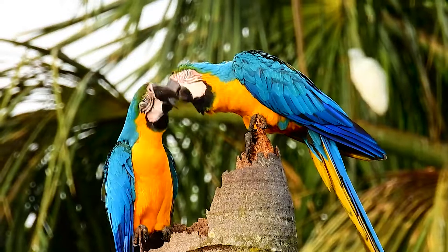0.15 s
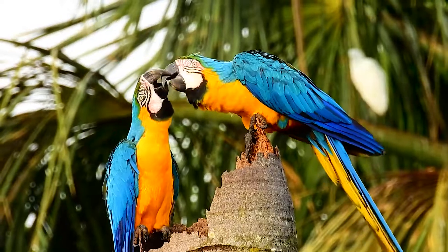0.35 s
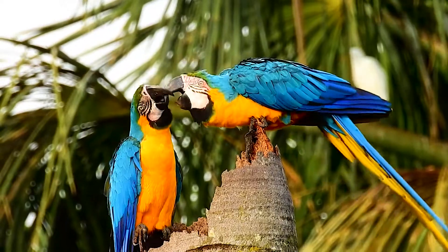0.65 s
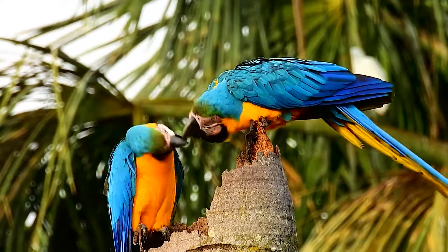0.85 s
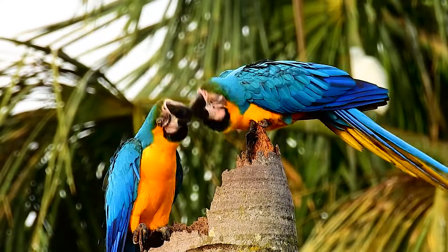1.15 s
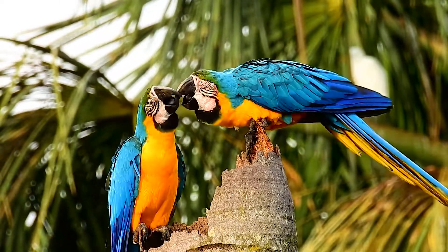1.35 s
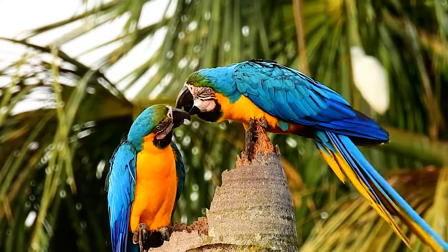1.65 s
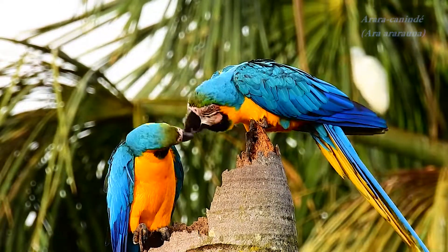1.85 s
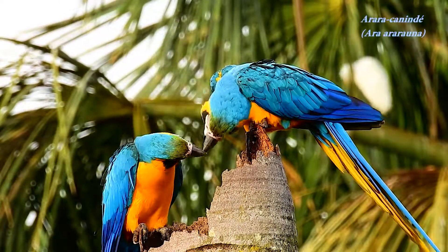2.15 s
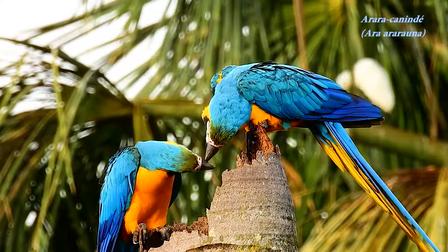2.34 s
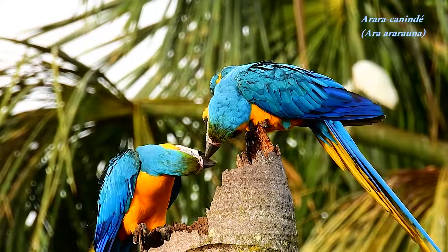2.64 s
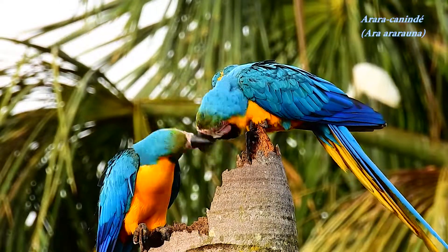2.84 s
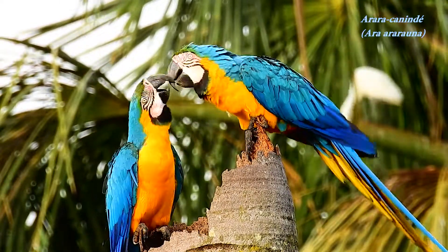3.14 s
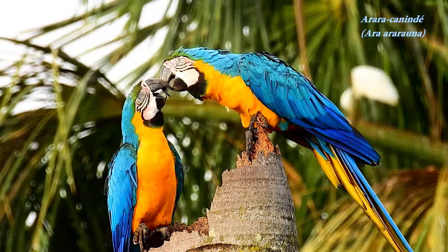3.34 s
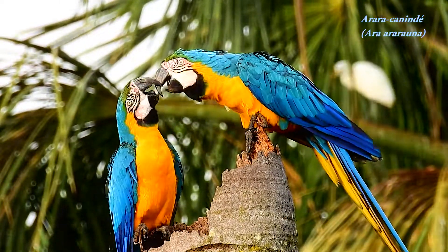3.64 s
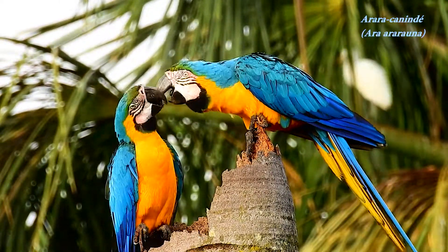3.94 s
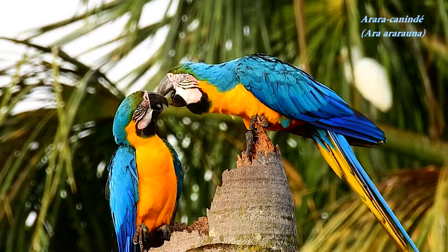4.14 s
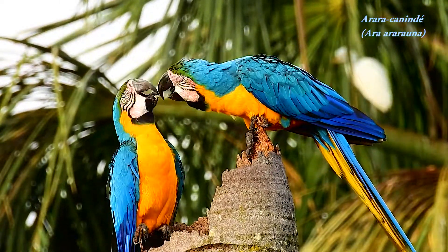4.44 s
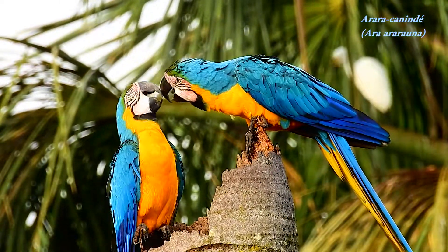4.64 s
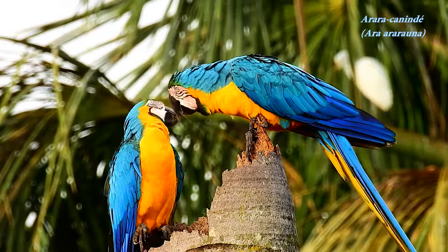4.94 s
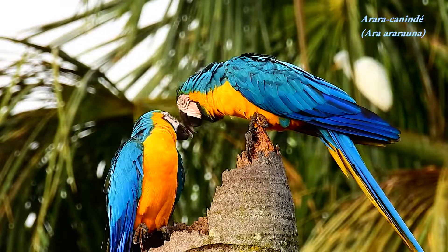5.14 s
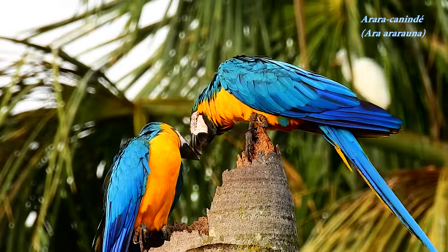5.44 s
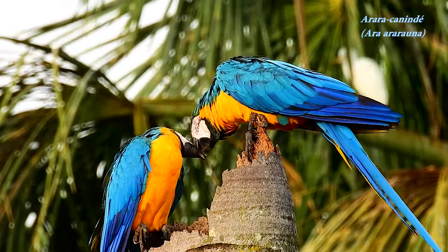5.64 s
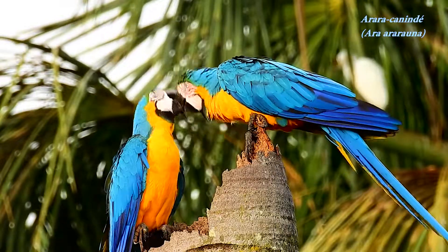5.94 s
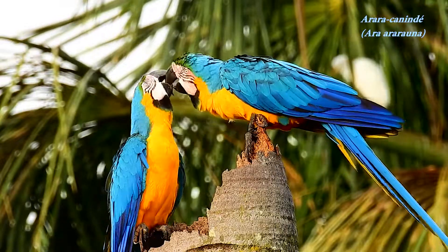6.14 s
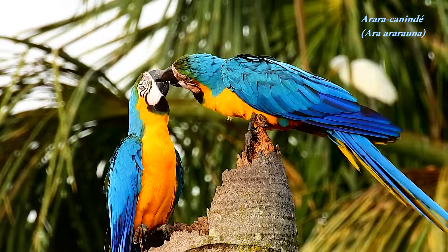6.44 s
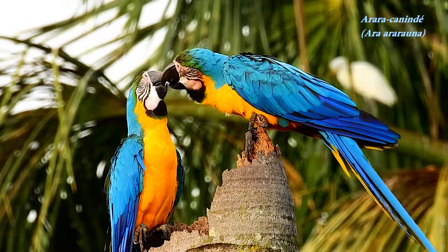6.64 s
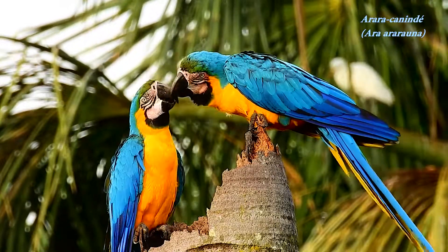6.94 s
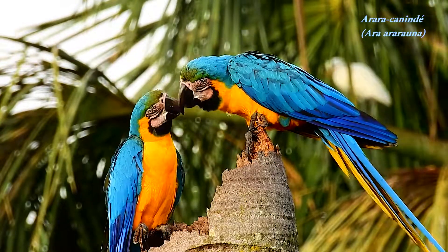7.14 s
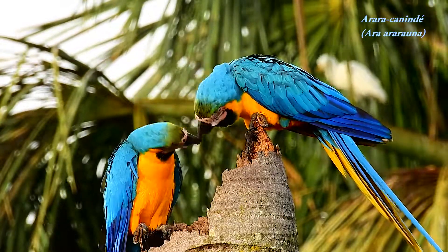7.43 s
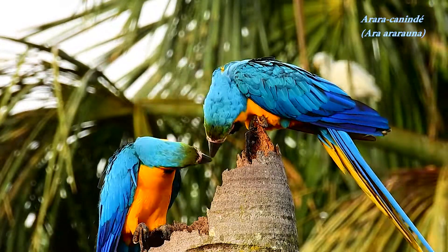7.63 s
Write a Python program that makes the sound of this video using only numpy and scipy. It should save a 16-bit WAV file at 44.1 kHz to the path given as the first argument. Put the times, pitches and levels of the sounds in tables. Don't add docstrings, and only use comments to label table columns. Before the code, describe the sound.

Two large parrots trade short harsh squawks and thin squeals outdoors over steady bright insect and leaf hiss, with small birds peeping faintly far off.

```python
import sys
import numpy as np
from scipy import signal
from scipy.fft import rfft, irfft, next_fast_len
from scipy.io import wavfile
from scipy.ndimage import uniform_filter1d

SR = 44100
rng = np.random.default_rng(int(sys.argv[2]) if len(sys.argv) > 2 else 0)


def boost_factor(decibels):
    exponent = np.asarray(decibels, float) / 20
    return 10 ** exponent


def materialize(psi):
    bounded = np.clip(np.atleast_2d(psi).T, -1, 1)
    quanta = np.round(bounded * 32767).astype(np.int16)
    wavfile.write(sys.argv[1], SR, quanta)


N = 343180

# (frequency [Hz], width [Hz], level [dB])
THROAT = [
    [(922, 230, -17.5), (1371, 129, 1), (1663, 160, -6), (2048, 203, -3.5), (2505, 106, 1.5)],
    [(3114, 390, 0), (3560, 320, 0.5)],
    [(4185, 250, 1.5), (4630, 310, -2.5), (5420, 660, -4.5)],
    [(6130, 570, -4.5), (7050, 310, -4), (8280, 340, -18.5)],
]
# (frequency [Hz], width [Hz], level [dB])
NARROW_THROAT = [
    [(997, 132, -15.5), (1335, 86, -9), (2042, 205, 3), (2810, 160, -10.5)],
    [(3160, 170, -7), (3660, 350, -3)],
    [(4250, 210, -2.5), (4790, 370, 1.5), (5380, 190, -16)],
]
# (rise [share], hold [share], start level [dB], end level [dB])
SQUEAL_SHAPE = (.35, .35, -7, -10)


def rms_one(x):
    return x / np.sqrt(np.mean(x ** 2) + 1e-20)


def at_hz(points, hz):
    points_hz, value = np.array(points).T
    return np.interp(np.log(hz), np.log(points_hz), value)


def drift(rate_hz, size=N):
    r = np.exp(-2 * np.pi * rate_hz / SR)
    settle = 9000
    noise = rng.standard_normal(size + settle)
    return rms_one(signal.lfilter([1], [1, -2 * r, r * r], noise)[settle:])


def resonance(x, hz, width_hz):
    r = np.exp(-np.pi * width_hz / SR)
    gain = (1 - r * r) / 2
    return signal.lfilter([gain, 0, -gain], [1, -2 * r * np.cos(2 * np.pi * hz / SR), r * r], x)


def swell(start_s, length_s, db, shape):
    rise, hold, first_db, last_db = shape
    times_s = start_s + length_s * np.array([0, rise, min(rise + hold, .95), 1])
    return times_s, db + np.array([first_db, 0, 0, last_db])


def call(rows, fade_s):
    s, *columns = np.transpose(rows)
    first, last = int((s[0] - fade_s) * SR), int((s[-1] + fade_s) * SR)
    t = np.arange(first, last) / SR
    fade = np.clip(np.minimum(t - s[0], s[-1] - t) / (2 * fade_s) + .5, 0, 1)
    return first, [np.interp(t, s, c) for c in columns], np.sin(fade * np.pi / 2)


def hiss():
    # (frequency [Hz], density [dB per Hz])
    colour = [(150, -90), (250, -53), (566, -31.5), (734, -31.5), (986, -18), (1130, -15.5), (1400, -9),
              (2080, -9.5), (3320, -4.5), (3560, -4.5), (3960, -4.5), (6780, 1.5), (9260, -20.5),
              (10100, -26), (15900, -33.5)]
    # (frequency [Hz], left-right likeness [-1 to 1])
    likeness = [(60, 0.15), (180, 0.61), (550, 1), (1650, 0.92), (4970, 0.27), (15000, 0.015)]
    hiss_db, swell_db, swell_s = -40, -0.5, .93
    size = next_fast_len(N)
    hz = np.maximum(np.fft.rfftfreq(size, 1 / SR), 1)
    alike = np.clip(at_hz(likeness, hz), -.9, .999)
    mid, side = rfft(rng.standard_normal((2, size)))
    dip = 1 - 0.42 * np.exp(-((hz - 3950) / 150) ** 2)
    pair = np.sqrt(1 + alike) * mid + np.sqrt(1 - alike) * side * [[1], [-1]]
    pair = pair * boost_factor(at_hz(colour, hz)) * dip
    pair = pair / np.std(irfft(pair * (hz > 5500) * (hz < 7500), size))
    out, together = 0, drift(0.46)
    opening = np.clip(1 - np.arange(N) / SR / swell_s, 0, 1)
    for centre_hz in np.geomspace(200, 16000, 20):
        share = np.clip(1 - np.abs(np.log(hz / centre_hz)) / (np.log(80) / 19), 0, 1)
        low = np.clip(np.log(5000 / centre_hz) / 0.47, 0, 1)
        slow_db = hiss_db - .4 * low + swell_db * (1 - low) * opening
        flicker_db = 0.4 * together + (.5 + 2.1 * low) * drift(9)
        out = out + boost_factor(slow_db + flicker_db) * irfft(pair * share, size)[:, :N]
    return out


def crickets():
    # (frequency [Hz], level [dB])
    lines = [(8258, -101), (8398, -61), (8543, -63.5), (8699, -61), (9098, -61.5)]
    white = rng.standard_normal((2, N))
    out = 0
    for hz, db in lines:
        line = resonance(resonance(white, hz, 60), hz, 60)
        out = out + boost_factor(db + 3) * rms_one(line)
    return out


def far_flock(count):
    out = np.zeros(N)
    for when, pitch, length, bend, level in rng.random((count, 5)):
        t = np.arange(int((.03 + .09 * length) * SR)) / SR
        hz = 1250 * 2.9 ** pitch * (1 + (bend - .5) * 1.57 * t)
        phase = 2 * np.pi * np.cumsum(hz) / SR
        note = np.hanning(len(t)) * (np.sin(phase) + 0.25 * np.sin(2 * phase))
        first = int(when * (N - len(t)))
        out[first:first + len(t)] += boost_factor(-58.5 + 9 * level) * note
    return out


def peeps():
    # (start [s], length [s], level [dB], pitch [Hz])
    far_peeps = [(.23, 0.065, -41, 3450), (1.441, 0.023, -29, 3310), (1.895, 0.038, -39.5, 3340),
                 (2.47, 0.05, -44, 3515), (3.475, .085, -46, 3450), (3.72, .11, -49, 3520),
                 (4.53, 0.072, -47.5, 3430), (5.7, .075, -48.5, 3420), (6.89, 0.072, -46, 3370),
                 (7.45, 0.12, -47.5, 3340)]
    # (start [s], length [s], level [dB], first pitch [Hz],
    # last pitch [Hz])
    whistles = [(.975, .055, -39, 4480, 4950), (1.032, .036, -36, 3300, 3880),
                (1.428, .022, -37, 3900, 4900), (1.895, .025, -39, 4300, 5100),
                (4.078, .026, -40, 2730, 2340), (4.105, .035, -44, 1810, 1800),
                (4.395, .095, -47, 2140, 2010), (4.455, .095, -48, 1860, 1760),
                (4.55, .03, -50, 2090, 2020), (5.6, .04, -45, 2450, 2310), (5.61, .058, -41, 2060, 2150),
                (6.038, .016, -44, 2420, 1950), (6.168, .025, -46, 2000, 2010),
                (7.68, .05, -50, 1764, 2050)]
    rise_share = 0.027
    out = np.zeros(N)
    notes = [(*p, p[3] * (1 + rise_share)) for p in far_peeps] + whistles
    for start_s, length_s, peak_db, first_hz, last_hz in notes:
        s, level_db = swell(start_s, length_s, peak_db, SQUEAL_SHAPE)
        glide_hz = first_hz + (last_hz - first_hz) * (s - start_s) / length_s
        first, (hz, db), fade = call(np.transpose([s, glide_hz, level_db]), .006)
        phase = 2 * np.pi * np.cumsum(hz * (1 + 0.0051 * drift(40, len(hz)))) / SR
        level = boost_factor(db + 4.3 * drift(54, len(hz)))
        out[first:first + len(hz)] += np.sqrt(2) * fade * level * np.sin(phase)
    return out


def short_squawk(start_s, length_s, db, gape, strain):
    # (rise [share], hold [share], start level [dB], end level [dB])
    shape = (.5, 0.4, -12, -9)
    return [(s, level_db, gape, strain) for s, level_db in zip(*swell(start_s, length_s, db, shape))]


def syrinx_roughness(t):
    # (start [s], length [s], roughness [0-1])
    locks = [(.578, .015, .3), (.878, .035, .2), (1.147, .03, .14), (1.202, .025, .12), (1.293, .033, .2),
             (1.52, .05, .2), (3.57, .13, .4)]
    usual, lock_s = .75, .012
    rough = usual
    for start_s, length_s, locked in locks:
        inside = np.clip(np.minimum(t - start_s, start_s + length_s - t) / lock_s + 1, 0, 1)
        rough = rough - (usual - locked) * inside
    return rough


def squawks(calls, throat, shrill_db=0):
    # (time [s], pulse rate [1/s])
    pulse_rate = [(.55, 400), (.62, 380), (.87, 290), (.91, 285), (1.14, 365), (1.18, 398), (1.22, 407),
                  (1.3, 340), (1.34, 335), (1.52, 550), (1.6, 550), (3.2, 300), (3.57, 520), (3.61, 520),
                  (3.63, 900), (3.65, 900), (3.67, 260), (6.3, 300)]
    # (shut [dB], per gape [dB], per strain [dB])
    opening = [
        (-16, 22, -0.5),
        (-9, 8, 6),
        (-17, 1.5, 17),
    ]
    strain_tilt_db = 6
    waver_db = 2.6
    out, lead = np.zeros(N), 1500
    for rows in calls:
        first, (db, gape, strain), fade = call(rows, .006)
        over_db = [0]
        for k, (shut, per_gape, per_strain) in enumerate(opening):
            over_db.append(shut + per_gape * gape + per_strain * strain + shrill_db * (k == 1))
        size = len(db) + lead
        t = (first - lead + np.arange(size)) / SR
        per_s = np.interp(t, *np.transpose(pulse_rate))
        rough = syrinx_roughness(t)
        cycles = np.cumsum(per_s * np.exp(.22 * rough ** 2 * drift(70, size))) / SR
        pulses = np.diff(np.floor(cycles), prepend=0) * boost_factor(2.6 * rough * drift(240, size))
        air = rng.standard_normal(size) * np.exp(-1.5 * (cycles % 1))
        shut_db = .32 * min(db.max() + 27, 0)
        for group, (modes, over) in enumerate(zip(throat, over_db)):
            breathy = np.clip(rough + .1 + .09 * group, 0, 1)
            tilt_db = strain_tilt_db * (np.pad(strain, (lead, 0), mode="edge") - .5) * (group == 0)
            source = (1 - breathy) * rms_one(pulses) + breathy * rms_one(air)
            rung = 0
            for k, (hz, width_hz, mode_db) in enumerate(modes):
                level_db = mode_db + shut_db * (width_hz > 110) + tilt_db * np.log2(hz / 1700)
                level_db = level_db + waver_db * drift(16.16, size)
                mode = resonance(resonance(source, hz, 1.44 * width_hz), hz, 1.62 * width_hz)
                rung = rung + boost_factor(level_db) * (-1) ** k * mode
            even = np.sqrt(uniform_filter1d(rung ** 2, size=2000) + 1e-12)
            out[first:first + len(db)] += boost_factor(db + over) * fade * (rung / even)[lead:]
    return out


def first_bird():
    # (start [s], length [s], low throat level [dB], gape [0-1], strain [0-1])
    short = [(.45, 0.11, -40.5, 0, 0.4), (0.557, 0.08, -32.5, 0, 0.7), (0.816, 0.1063, -27.5, 0.1, 0.83),
             (0.962, 0.077, -28.5, 0.23, 0.45), (1.343, 0.072, -37.5, 0.91, 0.8),
             (1.517, 0.044, -37, .05, 0), (3.2, 0.099, -40, 0.27, .7), (3.28, .15, -39.5, 0.43, 0.5),
             (3.477, 0.1, -40.5, 0.68, 0.55), (6.035, 0.032, -42, 0.78, 1), (6.298, 0.12, -38, 0.61, 0.53),
             (6.382, 0.11, -36, 0.4, 0.43), (6.5, 0.063, -36, 0.3, 0.14), (6.547, 0.042, -31.5, 0.43, .5),
             (6.586, .028, -33, 0.35, .05), (6.608, 0.04, -43, 0.4, .3)]
    # (time [s], low throat level [dB], gape [0-1], strain [0-1])
    long_squawk = [(1.062, -36, 0.2, 0.3), (1.08, -28, 0.65, 0.34), (1.11, -25.5, 0.04, 0.57),
                   (1.14, -25, 0.53, 0.7), (1.17, -27, 0.88, 0.7), (1.235, -25, 0.93, 0.68),
                   (1.26, -24, 0.26, 0.33), (1.32, -27, 0.55, 0.6), (1.34, -32, 0.3, 0.5)]
    return squawks([short_squawk(*row) for row in short] + [long_squawk], THROAT)


def second_bird():
    # (time [s], low throat level [dB], gape [0-1], strain [0-1])
    screech = [(3.562, -35, 0.87, 0.78), (3.585, -25.5, 0.69, 0.72), (3.62, -28.5, 0.82, 0.79),
               (3.65, -33.5, 0.95, 0.93), (3.69, -28, 0.32, 0.34), (3.712, -33.5, 0.36, 0.26),
               (3.728, -43, 0.65, .5)]
    throat = NARROW_THROAT + THROAT[3:]
    yelp = short_squawk(start_s=7.0, length_s=.06, db=-51, gape=.05, strain=.4)
    return squawks([screech], throat, shrill_db=2.5) + squawks([yelp], throat, shrill_db=17)


def short_squeal(start_s, length_s, db, hz, beak_hz, rising):
    flick_rise, rest_hz, sag_share = .14, 900, .22
    s, level_db = swell(start_s, length_s, db, SQUEAL_SHAPE)
    if rising:
        pitch_hz = hz * (1 + flick_rise * (s - start_s) / length_s)
    else:
        pitch_hz = hz - sag_share * max(hz - rest_hz, 0) * np.array([1, 0, 0, 1])
    return np.transpose([s, pitch_hz, level_db, np.full(len(s), beak_hz)])


def squeals():
    # (start [s], length [s], level [dB], top pitch [Hz], beak resonance [Hz])
    arches = [(1.648, .024, -33, 1072, 5300), (1.675, .02, -35, 878, 4000), (3.875, .04, -38, 885, 2700),
              (3.92, .11, -43, 995, 2550), (4.035, .04, -36, 1115, 3200), (4.985, .063, -37, 1090, 4600),
              (5.156, .044, -33, 1095, 4500), (5.885, .047, -39, 835, 3600), (5.935, .045, -40, 990, 4900)]
    # (start [s], length [s], level [dB], first pitch [Hz], beak resonance [Hz])
    flicks = [(1.405, 0.0236, -31, 1146, 4220), (1.848, 0.029, -36, 1062, 4060),
              (1.876, 0.021, -33.5, 1145, 4250), (6.004, 0.039, -39, 945, 4200),
              (7.49, .07, -38, 757, 2250)]
    # (time [s], pitch [Hz], level [dB], beak resonance [Hz])
    long_squeals = [
        [(1.695, 1060, -36, 5300), (1.705, 1095, -33, 5200), (1.725, 1112, -34, 4900), (1.745, 1133, -36, 4400),
         (1.757, 1090, -41, 4300), (1.775, 990, -50, 4000)],
        [(4.678, 944, -41, 3000), (4.69, 1071, -36, 3000), (4.712, 1143, -30, 3500), (4.738, 1161, -29, 5600),
         (4.76, 1266, -32, 5700), (4.78, 1335, -27, 5900), (4.8, 1285, -23.5, 5400), (4.822, 1276, -24.5, 5400),
         (4.845, 1330, -28, 5400)],
        [(4.852, 1224, -32, 4900), (4.9, 1223, -35, 5200), (4.915, 1104, -35, 5000), (4.935, 1140, -38, 5000),
         (4.955, 1062, -48, 4400)],
        [(5.297, 1010, -42, 4400), (5.32, 1085, -33, 4600), (5.338, 1190, -27, 4900), (5.352, 1225, -25, 5400),
         (5.364, 1190, -28, 5300), (5.38, 1080, -44, 4600)],
    ]
    # (frequency [Hz], level [dB])
    colour = [(1200, -17), (2100, 4), (2600, -2), (3900, -3), (5000, 1), (6300, -0.5), (7700, -7.5),
              (8300, -38)]
    overtone, overtone_share = 2.44, 0.79
    quaver_share = .008
    out = np.zeros(N)
    calls = [short_squeal(*row, rising=False) for row in arches]
    calls += [short_squeal(*row, rising=True) for row in flicks]
    for rows in calls + long_squeals:
        first, (hz, db, beak_hz), fade = call(rows, 0.0055)
        size = len(hz)
        quavering_hz = uniform_filter1d(hz, size=200) * (1 + quaver_share * drift(137, size))
        phase = 2 * np.pi * np.cumsum(quavering_hz) / SR
        for k in range(1, 9):
            near_beak = np.exp(-(np.log(k * hz / beak_hz) / 0.36) ** 2)
            near_overtone = np.exp(-(np.log(k * hz / (overtone * beak_hz)) / 0.36) ** 2)
            off_db = -14 * (1 - near_beak - overtone_share * near_overtone)
            level_db = db + off_db + at_hz(colour, k * hz) + 3.27 * drift(70, size)
            out[first:first + size] += np.sqrt(2) * fade * boost_factor(level_db) * np.sin(k * phase + k * k)
    return out


def grove(x):
    # (delay [s], left level [dB], right level [dB])
    echoes = [(.011, -12.5, -14), (.019, -18, -14), (.027, -12.5, -14), (.038, -20, -17),
              (.048, -14, -18.5), (.061, -22, -17.5)]
    dull = signal.sosfilt(signal.butter(1, 4000, fs=SR, output="sos"), x)
    return sum(np.roll(dull, int(s * SR)) * boost_factor([[left], [right]]) for s, left, right in echoes)


def scene():
    surroundings = hiss() + crickets()
    radiation = signal.butter(3, 650, "high", fs=SR, output="sos")
    voices = signal.sosfilt(radiation, first_bird() + second_bird())
    birds = far_flock(count=150) + peeps() + voices + squeals()
    placed = np.array([np.roll(birds, 1), birds])
    return (placed + grove(birds) + surroundings) * boost_factor([[-.35], [.35]])


def roll_off(x):
    return signal.sosfilt(signal.butter(12, 16020, fs=SR, output="sos"), x)


def record(dry):
    # (time [s], level [dB], width [Hz])
    glitch = (5.1572, -35, 3000)
    cut = signal.sosfilt(signal.butter(3, 450, "high", fs=SR, output="sos"), dry)
    s, db, width_hz = glitch
    tick = boost_factor(db) * np.exp(-((np.arange(N) / SR - s) * np.pi * width_hz) ** 2)
    return roll_off(cut + tick)


dry = scene()
out = record(dry)
materialize(out)
```